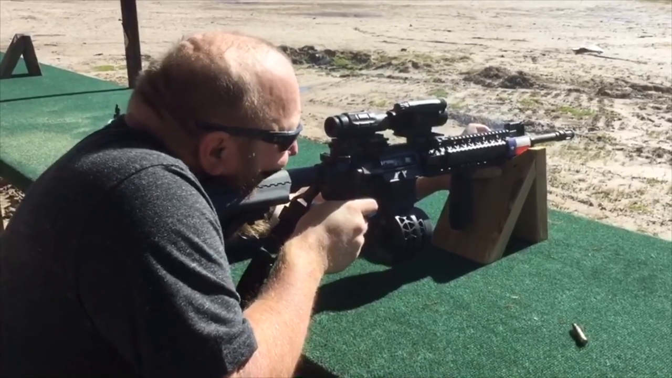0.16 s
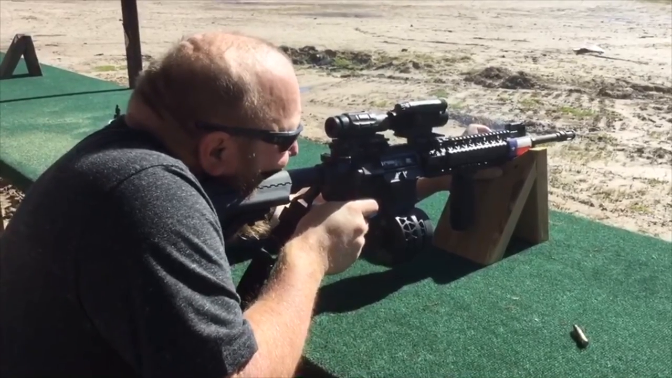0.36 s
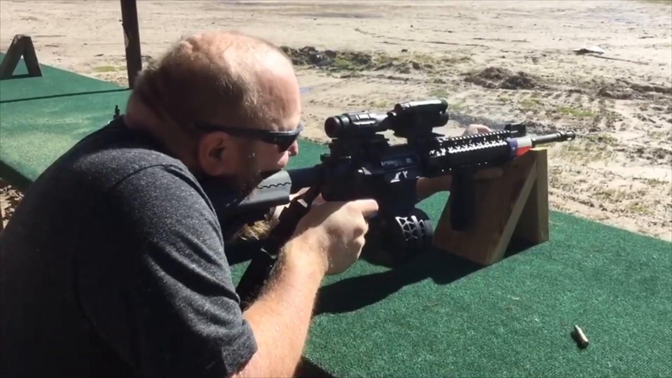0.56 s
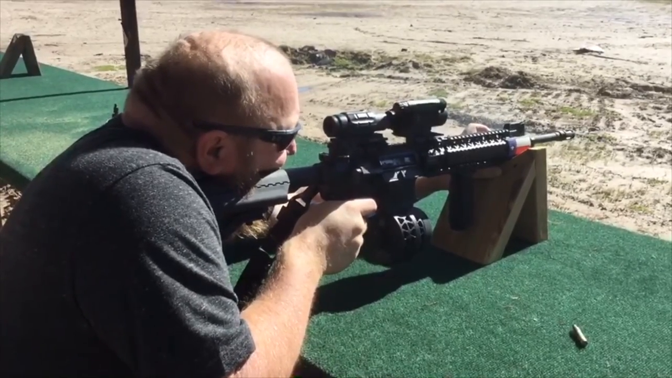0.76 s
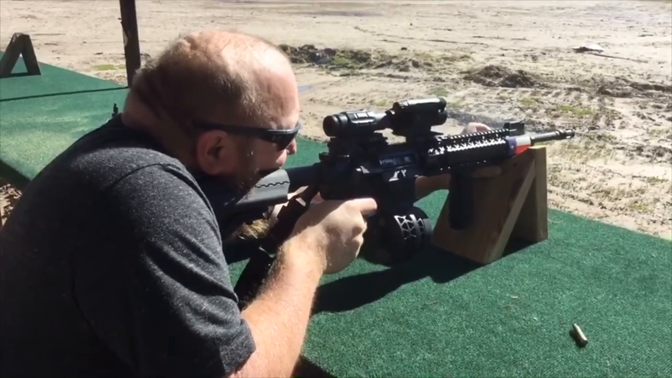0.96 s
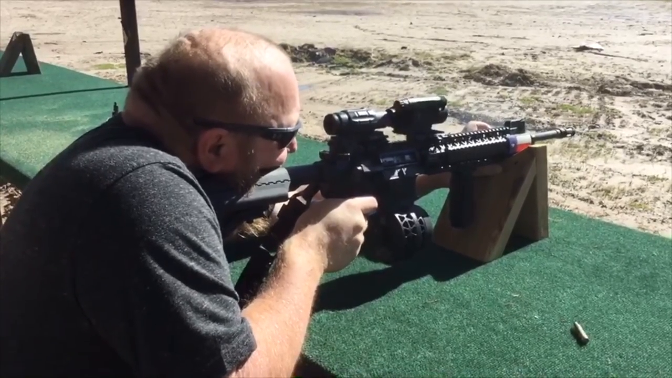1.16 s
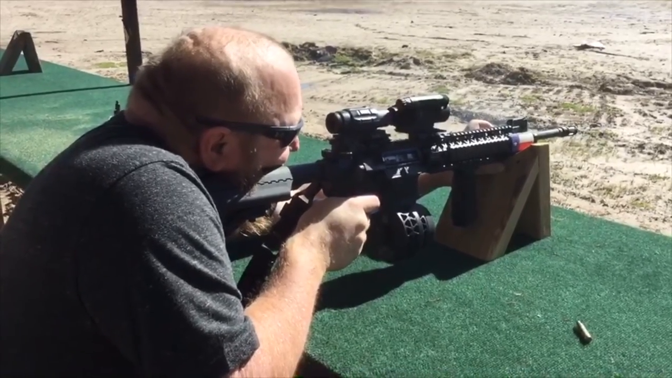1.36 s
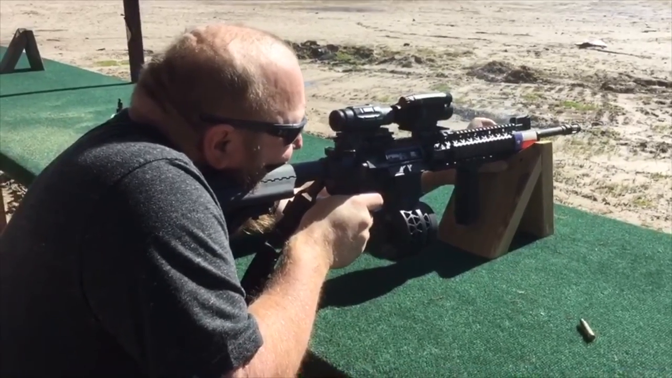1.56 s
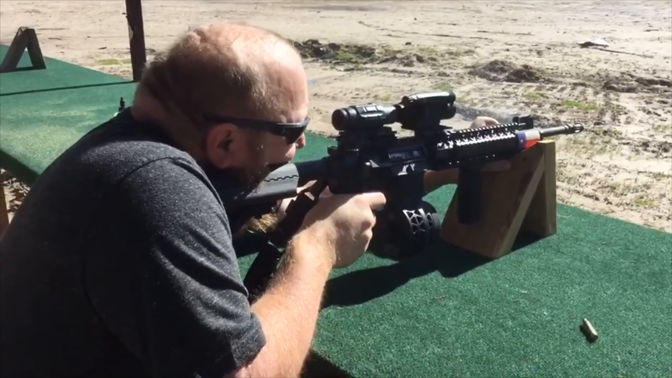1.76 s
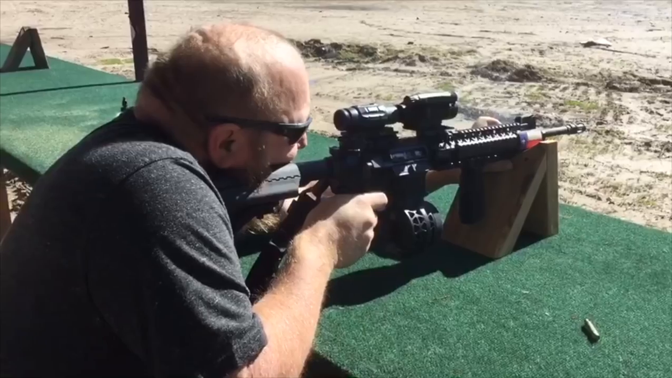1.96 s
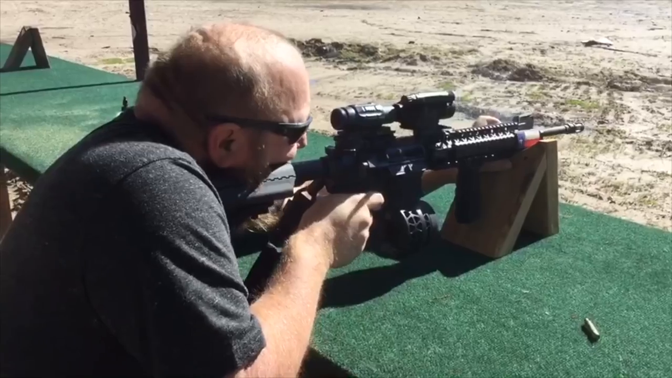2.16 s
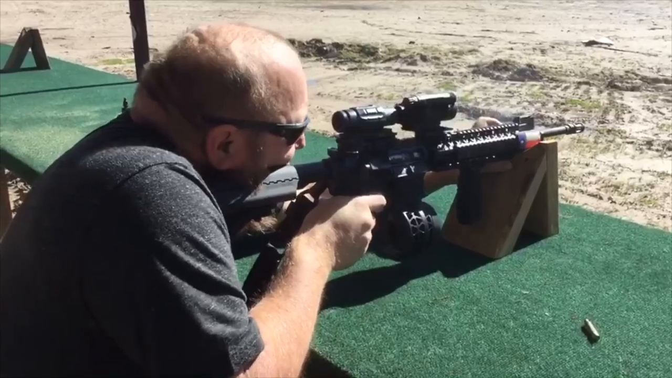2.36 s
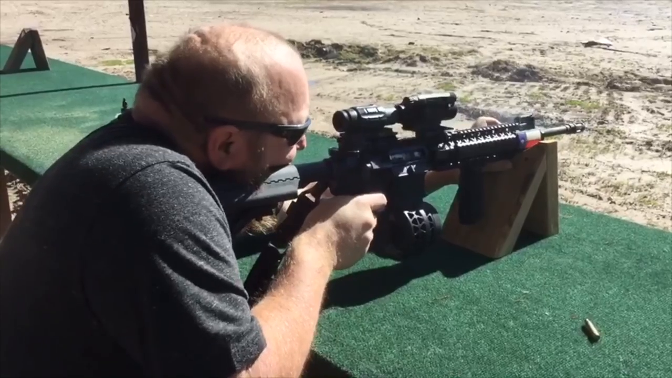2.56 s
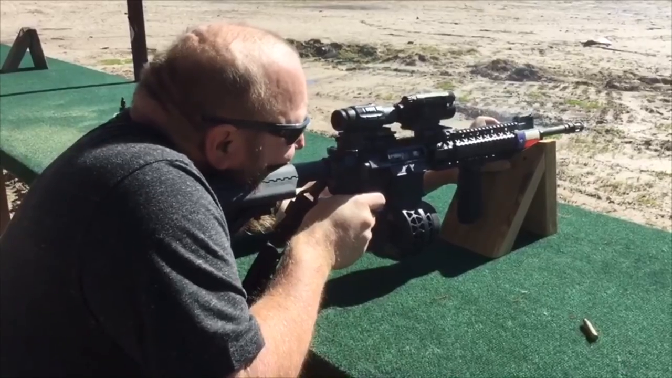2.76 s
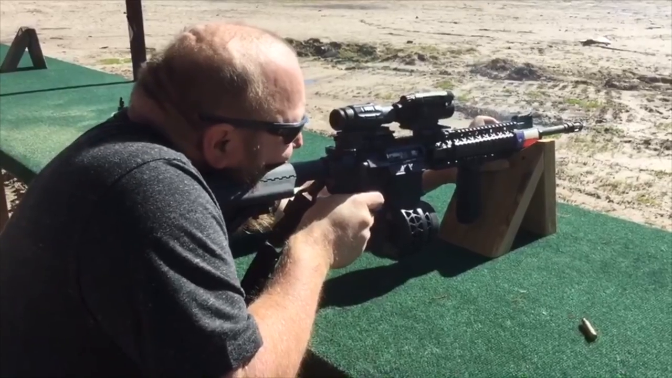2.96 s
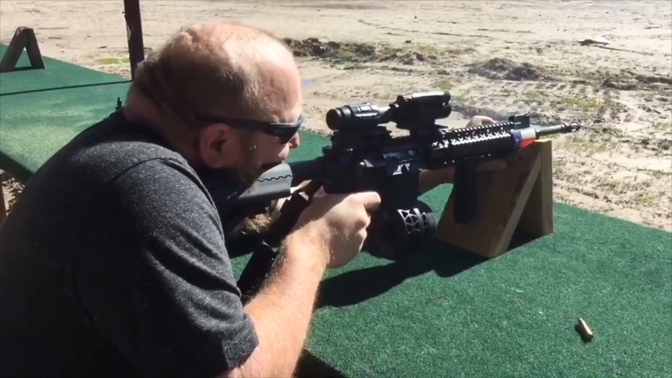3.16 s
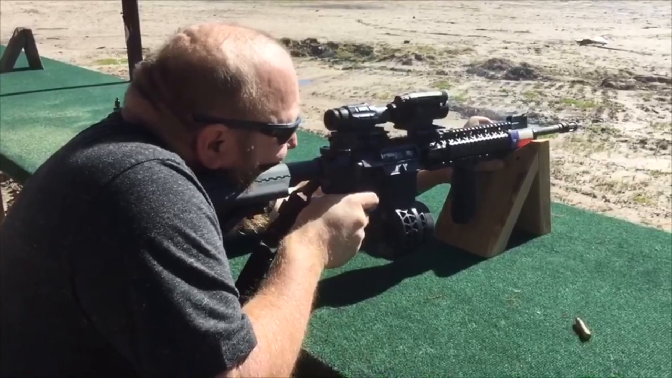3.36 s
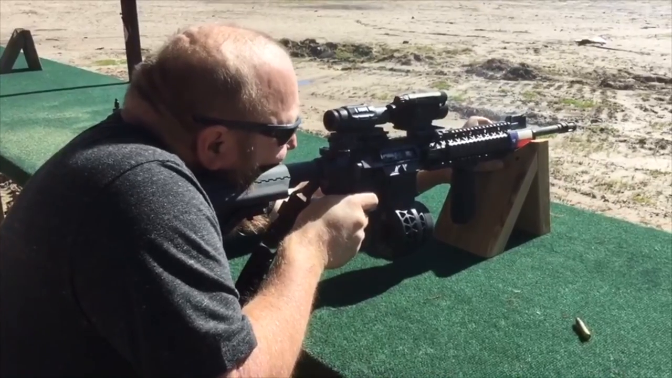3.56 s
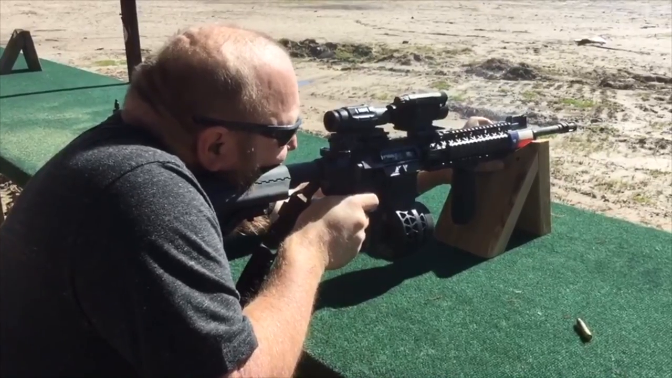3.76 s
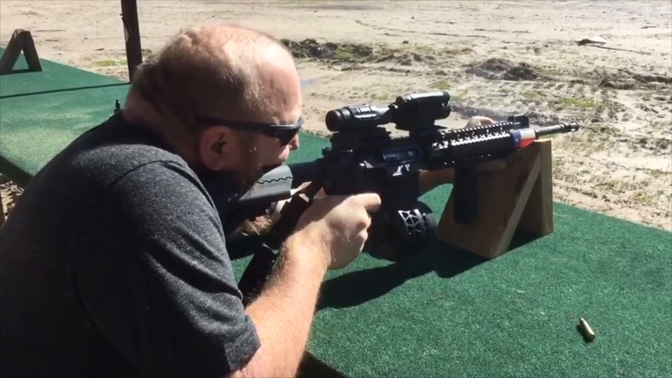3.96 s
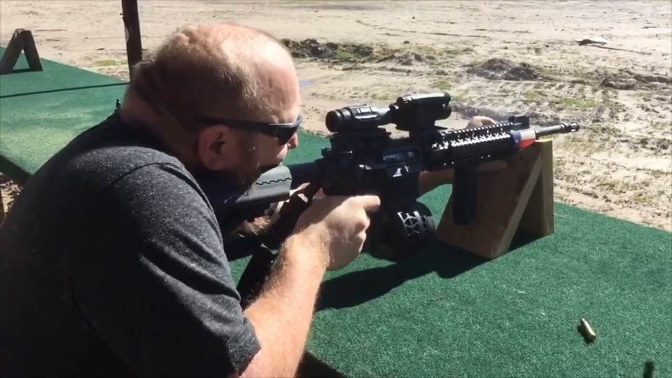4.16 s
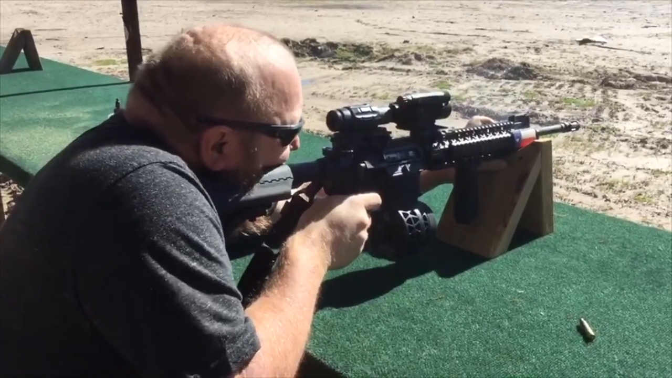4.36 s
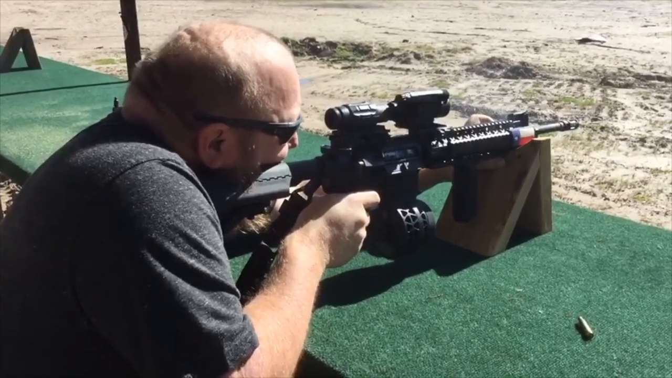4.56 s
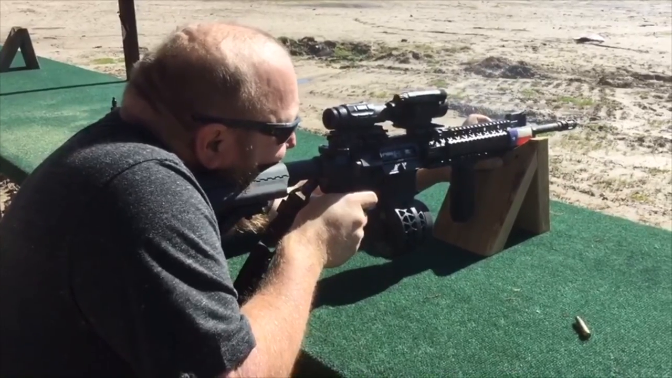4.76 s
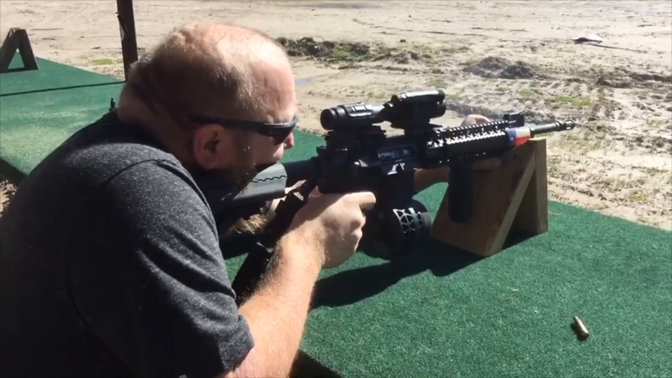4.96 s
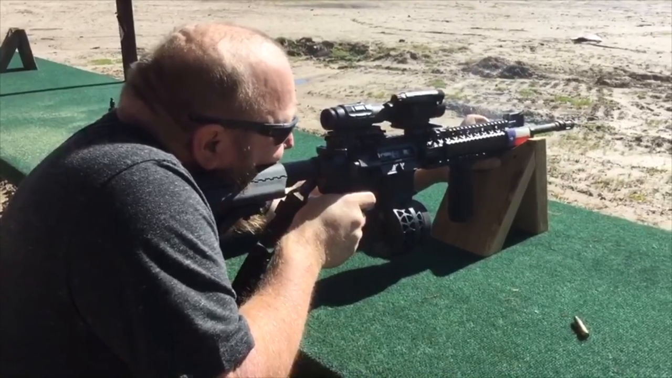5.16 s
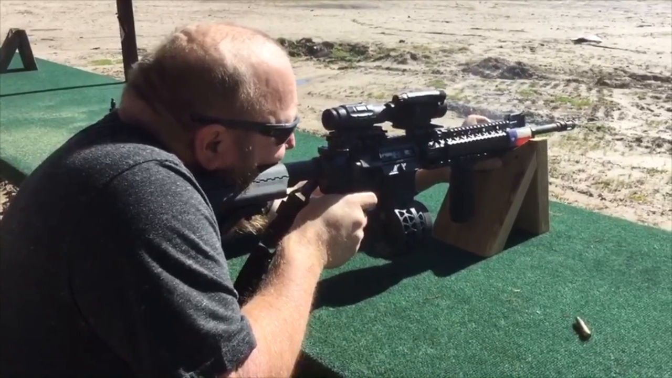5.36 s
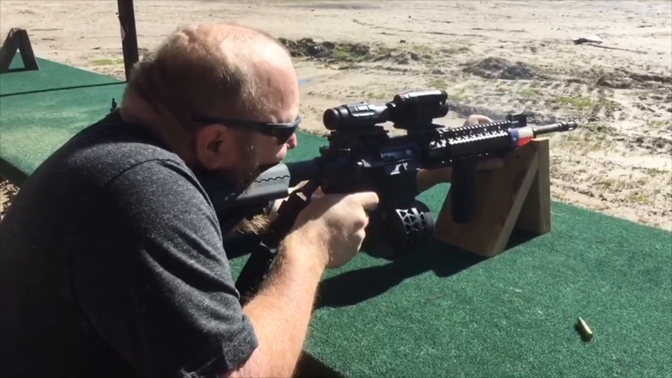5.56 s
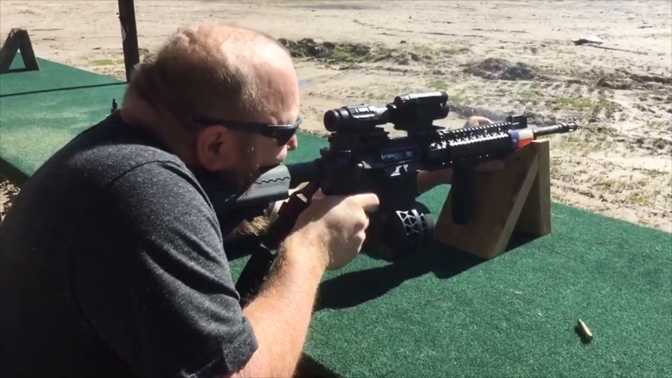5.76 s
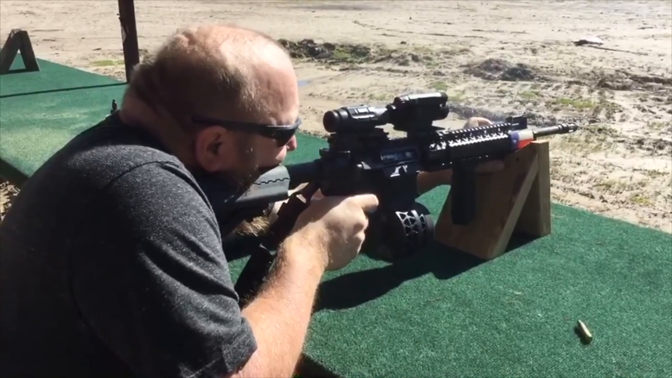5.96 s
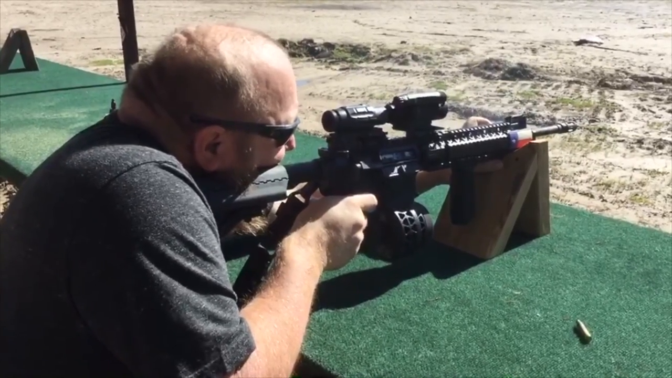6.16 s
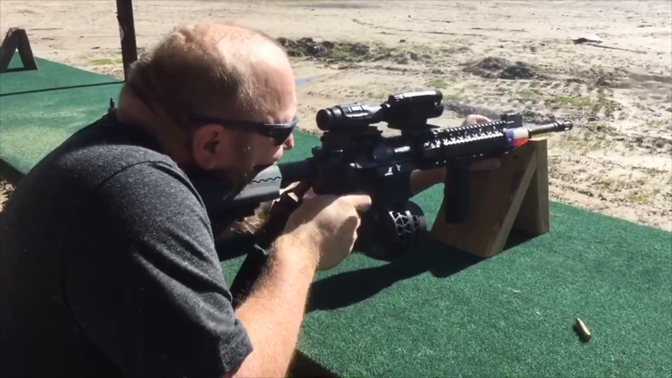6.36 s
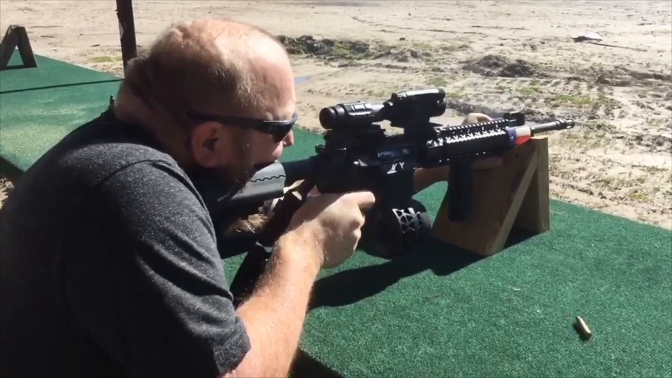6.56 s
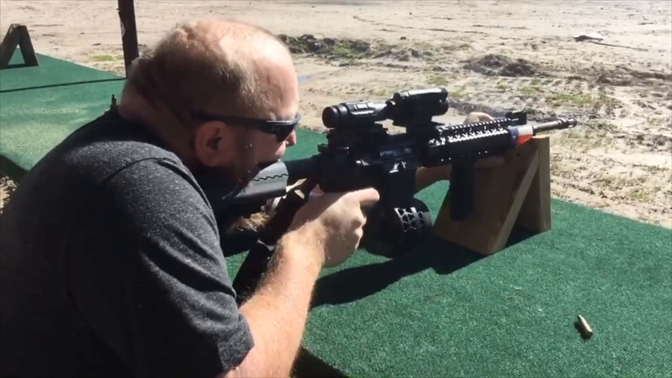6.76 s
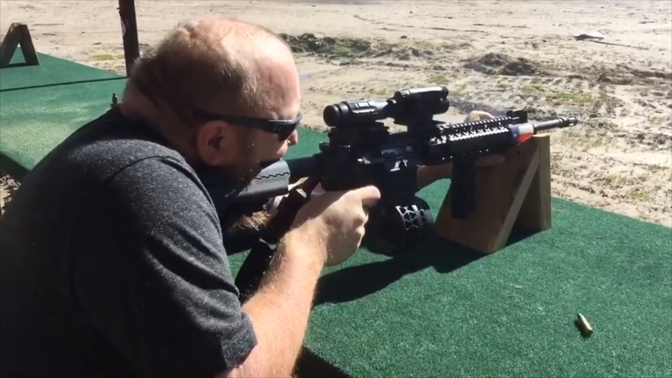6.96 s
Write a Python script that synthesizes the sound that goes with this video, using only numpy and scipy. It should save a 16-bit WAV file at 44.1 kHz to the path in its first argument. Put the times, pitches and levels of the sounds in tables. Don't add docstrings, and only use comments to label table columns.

```python
import sys
import numpy as np
from scipy import signal
from scipy.io import wavfile
from scipy.ndimage import uniform_filter1d

SR = 44100
rng = np.random.default_rng(int(sys.argv[2]) if len(sys.argv) > 2 else 0)


def bounce(signal):
    frames = np.transpose(np.atleast_2d(signal))
    limited = np.clip(frames, -1, 1)
    pcm = np.round(limited * 32767).astype(np.int16)
    wavfile.write(sys.argv[1], SR, pcm)


def convert_level_to_amplitude(level_db):
    exponent = np.asarray(level_db, float) / 20
    return 10 ** exponent


N = 313110
SHORT, LONG, PUFF = 512, 1024, 4000


def read(points, hz, axis=1):
    table = np.transpose(points)
    return np.interp(np.log(hz + 1), np.log(table[0] + 1), table[axis])


def evened(x):
    return x / np.sqrt(np.mean(x ** 2) + 1e-20)


def add(mix, s, sound):
    at = round(s * SR)
    part = mix[max(at, 0):][:max(len(sound) + min(at, 0), 0)]
    part += sound[max(-at, 0):][:len(part)]


def chance(frames, size):
    real, imaginary = rng.standard_normal((frames, size // 2 + 1, 2)).T
    return real + 1j * imaginary


def step(t, at, rise):
    return .5 + .5 * np.tanh((t - at) / (2 * rise))


def burst(decay, edge_hz, kind):
    filt = signal.butter(3, min(edge_hz, 20000), kind, fs=SR)
    noise = evened(signal.lfilter(*filt, rng.standard_normal(PUFF)))
    return noise * np.exp(-np.arange(PUFF) / SR / decay)


def unrumbled(x):
    return signal.sosfilt(signal.butter(4, 52.0, "high", fs=SR, output="sos"), x)


def hush():
    # hz, density_db [dB per Hz]
    air_colour = [(15, -40), (25, -10), (64, 0), (242, -5), (489, -25), (560, -19), (1040, -18),
                  (2110, -28), (2610, -25), (3080, -33), (3820, -30), (6560, -42), (9070, -41),
                  (11600, -49), (16000, -80)]
    # centre_hz, width_hz, level_db [lift, or dip if
    machine_bands = [(80, 30, 3), (250, 90, -5), (1060, 90, 1.2), (1870, 60, 3), (2550, 200, 2.5),
                     (3780, 200, 2.5), (4560, 240, 2.5), (6500, 900, 3), (8740, 700, 4), (12500, 2400, 8)]
    hush_db, tilt_db = -45.3, 1.7
    calm_db, calm_tilt_db = -.8, -1.1
    frames, hz = 4 * N // LONG + 5, np.fft.rfftfreq(LONG, 1 / SR)
    t = np.arange(frames) * LONG / 4 / SR
    calm = step(t, 1.4, .04) - step(t, 2.8, .2)

    colour_db = read(air_colour, hz)
    for f, w, db in machine_bands:
        colour_db = colour_db + db / (1 + (2 * (hz - f) / w) ** 2)
    lasting = uniform_filter1d(rng.standard_normal((frames, len(hz))), size=30, axis=0)
    patches = evened(uniform_filter1d(lasting, size=4, axis=1)).T
    octaves = np.log2(np.maximum(hz, 1000) / 1000)[:, None]
    treble_db = octaves * (tilt_db + calm_tilt_db * calm)
    field_db = colour_db[:, None] + 2.1 * patches + treble_db + calm_db * calm

    z = chance(frames, LONG) * convert_level_to_amplitude(field_db)
    wash = evened(signal.istft(z, nperseg=LONG, noverlap=LONG * 3 // 4)[1][:N])
    return unrumbled(wash) * convert_level_to_amplitude(hush_db)


def engine():
    # pitch_hz, level_db [rms]
    firing_orders = [(79, -54), (157, -56), (236.9, -47.5)]
    on_s, off_s, rise_s, fall_s = 1.5, 2.6, .025, .2
    t = np.arange(N) / SR
    waver = .001 * evened(uniform_filter1d(rng.standard_normal(N), size=6000))
    turns = np.cumsum(1 + waver) / SR
    tone = sum(np.sqrt(2) * convert_level_to_amplitude(db) * np.sin(2 * np.pi * hz * turns) for hz, db in firing_orders)
    return tone * step(t, on_s, rise_s) * step(-t, -off_s, fall_s)


def whines():
    # start_s, end_s, pitch_hz, level_db [rms]
    whine_tones = [
        (.95, 1.35, 1870, -70),
        (3.88, 4.11, 1870, -64),
        (3.95, 4.11, 6450, -72),
        (5.45, 6.15, 1865, -65),
        (5.6, 6.4, 1464, -71),
        (5.5, 6.2, 2546, -73),
        (1.4, 2.25, 2546, -76),
        (6.25, 6.47, 2620, -68),
    ]
    out = np.zeros(N)
    drift = evened(uniform_filter1d(rng.standard_normal(N), size=1500))
    for start, end, hz, db in whine_tones:
        wobble = drift[round(start * SR):round(end * SR)]
        tone = np.sqrt(2) * np.sin(2 * np.pi * hz * np.cumsum(1 + .002 * wobble) / SR)
        add(out, start, convert_level_to_amplitude(db) * tone * signal.windows.tukey(len(tone), .3))
    return out


def ticks():
    # start_s, level_db [peak]
    knocks = [
        (2.4744, -37),
        (2.5022, -34),
        (2.5431, -37),
        (4.307, -37),
        (4.3899, -30),
        (6.7446, -30),
    ]
    out = np.zeros(N)
    for s, db in knocks:
        add(out, s, convert_level_to_amplitude(db - 10.5) * burst(.004, 4000, "high"))
    return out


def case():
    # start_s, level_db
    bounces = [
        (5.0236, -35),
        (5.0278, -32),
    ]
    # pitch_hz, level_db, t60_s
    brass_modes = [(6858, -19, .03), (10750, -13, .22), (10812, -16, .22), (14260, -16, .05),
                   (14860, -2.5, .19), (14935, -17, .4), (15160, -8, .18), (15205, -13, .12)]
    out, t = np.zeros(N), np.arange(SR // 3) / SR
    for s, db in bounces:
        add(out, s, convert_level_to_amplitude(db + .5) * burst(.0009, 9000, "high"))
    ring = sum(convert_level_to_amplitude(level - 60 * t / t60) * np.sin(2 * np.pi * hz * t) for hz, level, t60 in brass_modes)
    last_s, last_db = bounces[-1]
    add(out, last_s, convert_level_to_amplitude(last_db - 3.5) * ring * (1 - np.exp(-t / .003)))
    return out


def dying(z, table, size, rise=1e-4):
    boom_hz = 1900
    hop = size // 4
    hz, t = np.fft.rfftfreq(size, 1 / SR)[:, None], np.arange(z.shape[1]) * hop / SR
    colour = convert_level_to_amplitude(read(table, hz))
    fade = convert_level_to_amplitude(-60 * t / np.maximum(read(table, hz, axis=2), .02))
    fade *= 1 - np.exp(-(t / rise) ** 3) / (1 + (hz / boom_hz) ** 2)
    unit = np.sqrt(np.sum(colour ** 2) * 4 / 3)
    return signal.istft(z * colour * fade, nperseg=size, noverlap=size - hop)[1] / unit


def roll_gain(t):
    near = convert_level_to_amplitude(-18.5) * np.exp(-((t - .18) / .09) ** 2 / 2)
    return np.hypot(near, convert_level_to_amplitude(-14.5) * step(t, .268, .008))


def echoes(cycles=.98):
    # delay_s [after the shot], level_db [against the fade with distance]
    far_faces = [(.1384, -2.5), (.146, .5), (.154, -2.5), (.2093, -6), (.2837, 0), (.3088, 0), (.3212, 1),
                 (.3339, -3), (.354, 0), (.3656, 0), (.3829, -1.5), (.3949, -2), (.4072, -2), (.4243, 1),
                 (.44, -2), (.4471, 4.5), (.5104, -1), (.533, 1), (.5367, 4), (.5514, 2), (.576, 4.5),
                 (.5828, 0), (.6015, -1), (.64, 1), (.6502, 2.5), (.7529, 3), (.803, 0), (1.1924, 2.5),
                 (1.2754, 1.5), (1.3216, 7)]
    echo_db, fade_db_per_s = -6.5, 17.5
    echo_hz, sag_hz_per_s = 305, 60.0
    scatter_from_s, scatter_gap_s, scatter_db = .66, .03, -1.5
    out = np.zeros(3 * SR)
    place, size = rng.random((40, 2)).T
    loose = scatter_from_s + scatter_gap_s * (np.arange(len(place)) + place)
    for s, size_db in [*far_faces, *zip(loose, scatter_db - 4.0 * size)]:
        db = echo_db - fade_db_per_s * s + size_db
        hz = echo_hz - sag_hz_per_s * s
        turn = np.arange(-3 * SR // hz, 3 * SR // hz) * hz / SR
        pulse = -np.cos(2 * np.pi * turn + .5) * np.exp(-abs(turn / cycles) ** 2 * 2)
        add(out, s + turn[0] / hz, convert_level_to_amplitude(db - .3) * pulse)
        add(out, s - .002, convert_level_to_amplitude(db - 19) * burst(.008, 2500, "low"))
    return out


def slaps():
    # delay_s [after the shot], level_db, decay_s, top_hz
    wall_edges = [
        (.136, -19, .012, 1300),
        (.21, -27, .015, 700),
        (.279, -28, .012, 1500),
        (.533, -19, .009, 700),
        (1.102, -34, .005, 1300),
        (1.242, -35, .005, 1100),
    ]
    out = np.zeros(2 * SR)
    for s, db, decay, top_hz in wall_edges:
        add(out, s, convert_level_to_amplitude(db) * burst(decay, top_hz, "low"))
    return out


def sheet():
    from_hz, to_hz, glide_s, decay_s = 680, 240, .032, .022
    t = np.arange(2 * PUFF) / SR
    hz = to_hz + (from_hz - to_hz) * np.exp(-t / glide_s)
    hz *= 1 + .17 * evened(uniform_filter1d(rng.standard_normal(len(t)), size=120))
    swing = np.sin(2 * np.pi * np.cumsum(hz) / SR)
    return convert_level_to_amplitude(-2.5) * swing * (1 - np.exp(-t / .003)) * np.exp(-(t / (2 * decay_s)) ** 2 * 2)


def waves_db(t):
    # delay_s [after the shot], lull_db, surge_db
    returning_walls = [
        (.134, -5, 3.5),
        (.2, -4.5, 2.5),
    ]
    lull_s, surge_s = .022, .014
    gain_db = 0
    for s, lull_db, surge_db in returning_walls:
        lull = lull_db * np.exp(np.minimum(t - s, 0) / lull_s)
        surge = surge_db * np.exp(-np.maximum(t - s, 0) / surge_s)
        gain_db = gain_db + np.where(t < s, lull, surge)
    return gain_db


def rifle():
    # start_s, level_db [blast]
    shot_times = [
        (-.8378, 0.1),
        (2.2783, 0.1),
        (4.1111, 0.1),
        (6.4758, 0.1),
    ]
    # hz, density_db [dB per Hz], t60_s
    roof_roar = [(40, -12, .6), (120, 1.5, .42), (250, 7.5, .3), (400, 8.5, .29), (560, 8.5, .3),
                 (900, .5, .33), (1500, -2.5, .33), (2300, -4.5, .3), (3500, -10, .3), (6000, -16.5, .27),
                 (10000, -15.5, .22), (15000, -18, .205), (21000, -5.5, .12)]
    # hz, density_db [dB per Hz], t60_s
    hill_roll = [(40, -40, 3.1), (90, -15, 3.9), (155, -.5, 3.9), (260, -4, 3.9), (420, -9, 3.3),
                 (620, -12, 3.2), (850, -18, 3.1), (1300, -17.5, 3.2), (2800, -27, 2.9), (5000, -35, 2.3),
                 (9000, -35, 1.1), (15000, -38, .55)]
    # hz, density_db [dB per Hz], t60_s
    bank_colour = [(700, -9, .35), (1500, -1, .35), (3000, .1, .4), (6000, -6, .5), (10000, -7, .43),
                   (14000, -14, .38), (17000, -28, .3)]
    # delay_s [after the shot], level_db
    bank_answers = [
        (.18, -36.0),
        (.262, -35.0),
    ]
    # hz, likeness [0 to 1]
    shot_likeness = [(300, .98), (1200, .85), (4000, .5), (10000, .3)]
    roof_db, boom_rise_s = 16.6, .09

    out, far, boom = np.zeros(N), echoes(), sheet()
    sizes = {SHORT: SR // 256, LONG: 3 * SR // 256 + 4}
    place = {size: chance(frames, size) for size, frames in sizes.items()}
    t = np.arange(len(far)) / SR
    thump = np.sin(2 * np.pi * 270.0 * t[:PUFF]) * np.exp(-t[:PUFF] / .006)
    for s, db in shot_times:
        z = {}
        for size, frames in sizes.items():
            same = read(shot_likeness, np.fft.rfftfreq(size, 1 / SR))[:, None]
            z[size] = same * place[size] + np.sqrt(1 - same ** 2) * chance(frames, size)
        add(out, s, convert_level_to_amplitude(db + 9.0) * thump)
        add(out, s + .067, convert_level_to_amplitude(db) * boom)
        roar = dying(z[SHORT], roof_roar, SHORT, boom_rise_s)
        add(out, s, convert_level_to_amplitude(db + roof_db + waves_db(t[:len(roar)])) * roar)
        roll = dying(z[LONG], hill_roll, LONG)[:len(t)] * roll_gain(t)
        add(out, s, convert_level_to_amplitude(db) * (unrumbled(roll) + far))
        bank = dying(z[SHORT], bank_colour, SHORT)
        for after, bank_db in bank_answers:
            add(out, s + after - .012, convert_level_to_amplitude(db + bank_db) * bank * step(t[:len(bank)], .012, .003))
        add(out, s, convert_level_to_amplitude(db) * slaps())
    return out


def scene():
    mono = hush() + engine() + whines() + ticks() + case() + rifle()
    return np.array([mono, mono])


def band_limit(x):
    return signal.sosfilt(signal.butter(12, 16810, fs=SR, output="sos"), x)


def record(dry):
    full_scale, knee = .52, 4.5
    smear_db, smear_top_hz = -13.0, 7000
    mono = dry[0] / (1 + abs(dry[0] / full_scale) ** knee) ** (1 / knee)
    mono = signal.lfilter(*signal.butter(1, 11000.0, fs=SR), mono)
    frame = dict(nperseg=2 * LONG, noverlap=3 * LONG // 2)
    z = signal.stft(mono, **frame)[2]
    noise = uniform_filter1d(abs(z), size=9, axis=0) * chance(z.shape[1], 2 * LONG)
    noise /= 1 + (np.fft.rfftfreq(2 * LONG, 1 / SR)[:, None] / smear_top_hz) ** 3
    mono = mono + convert_level_to_amplitude(smear_db) * signal.istft(noise, **frame)[1][:N]
    mono = signal.lfilter(*signal.butter(2, 38.0, "high", fs=SR), mono)
    mono = signal.oaconvolve(mono, signal.firwin(255, 15900, fs=SR), "same")
    return band_limit(np.array([mono, mono]))


dry = scene()
out = record(dry)
bounce(out)
```